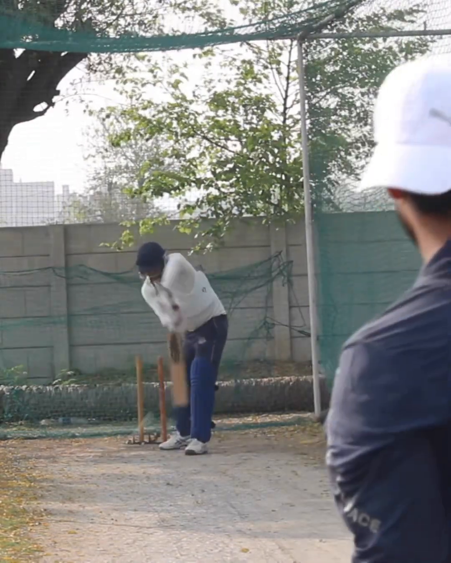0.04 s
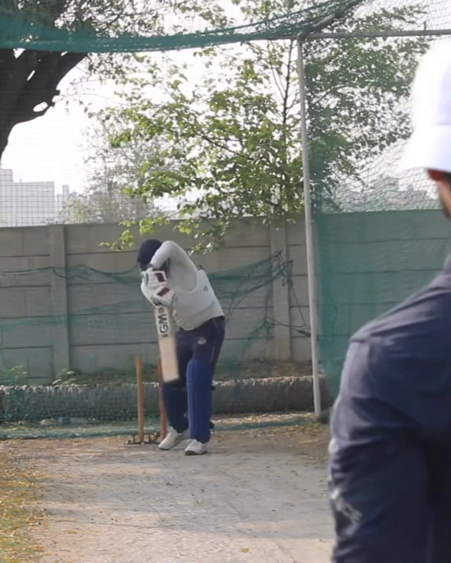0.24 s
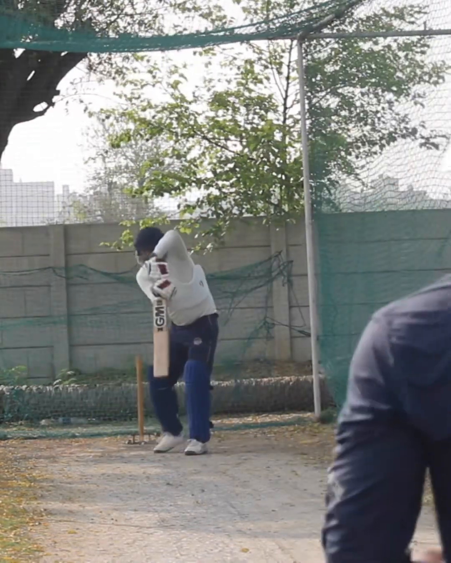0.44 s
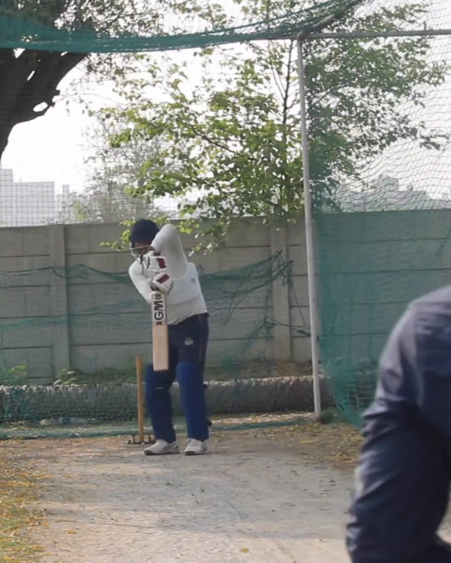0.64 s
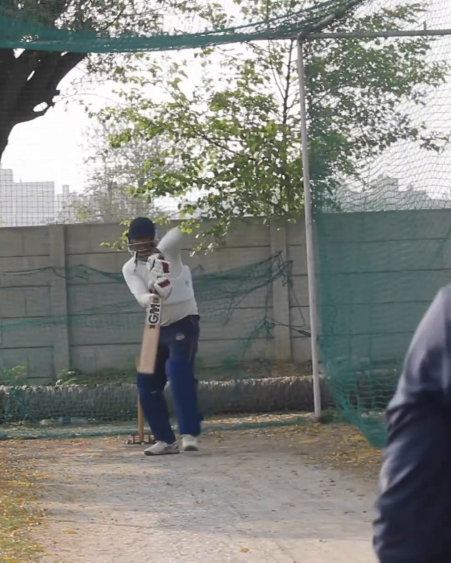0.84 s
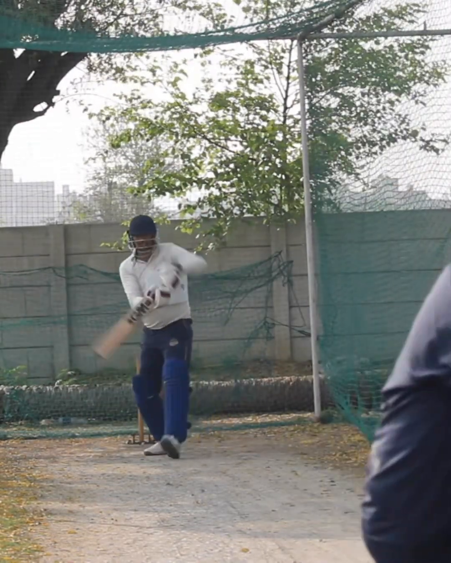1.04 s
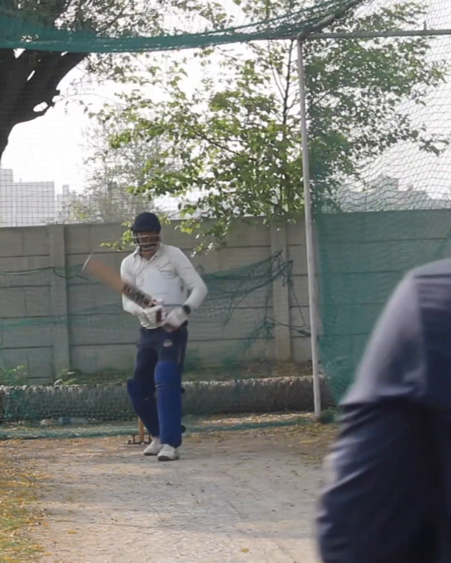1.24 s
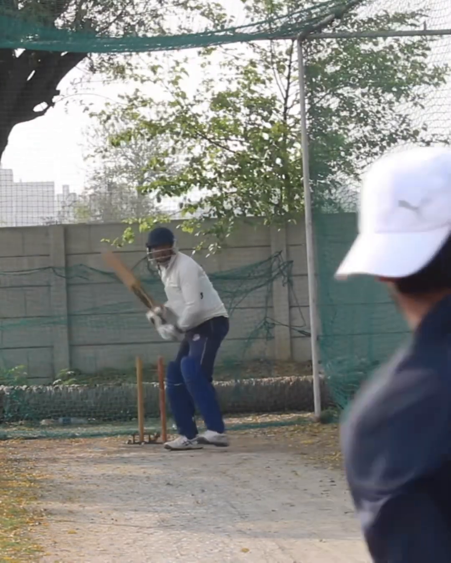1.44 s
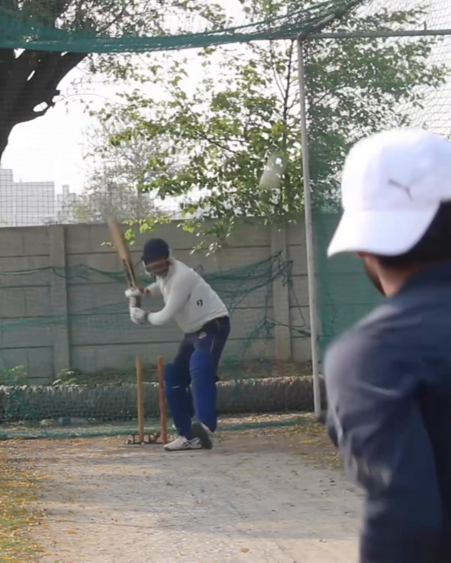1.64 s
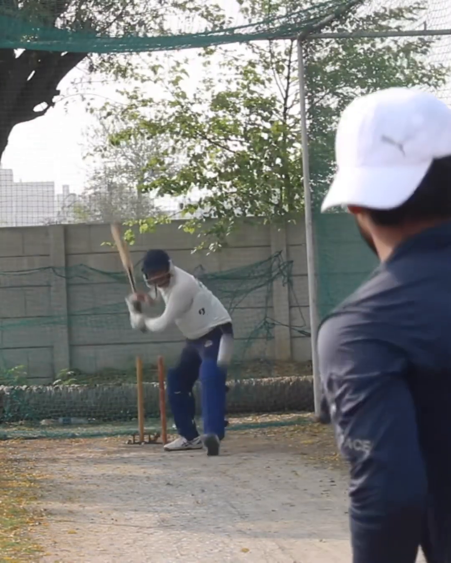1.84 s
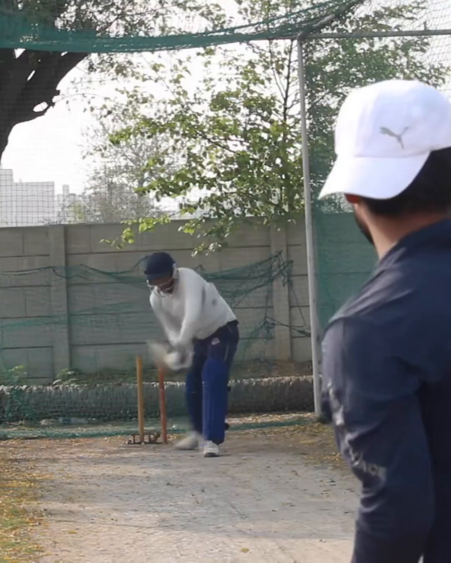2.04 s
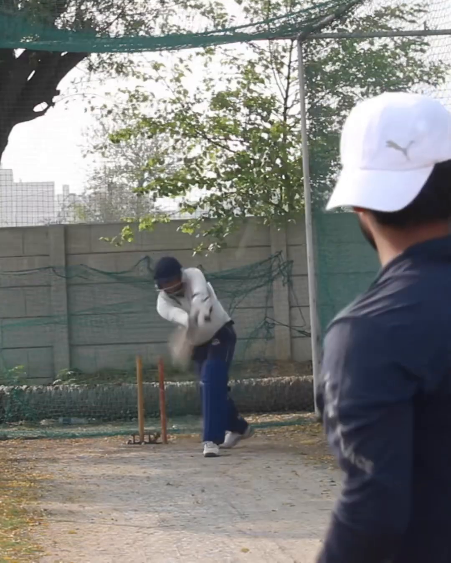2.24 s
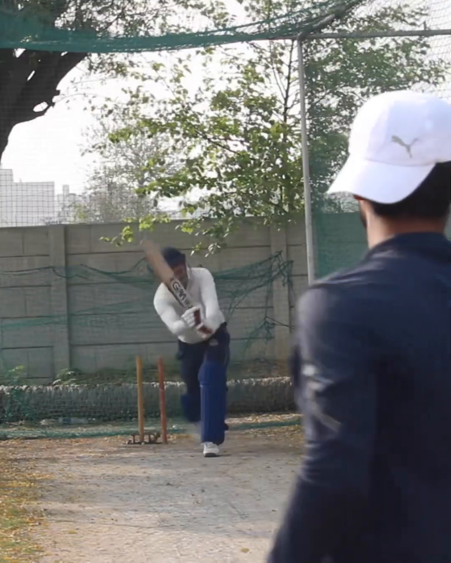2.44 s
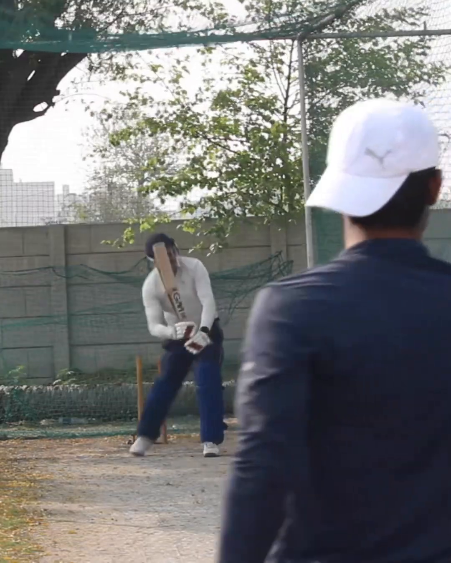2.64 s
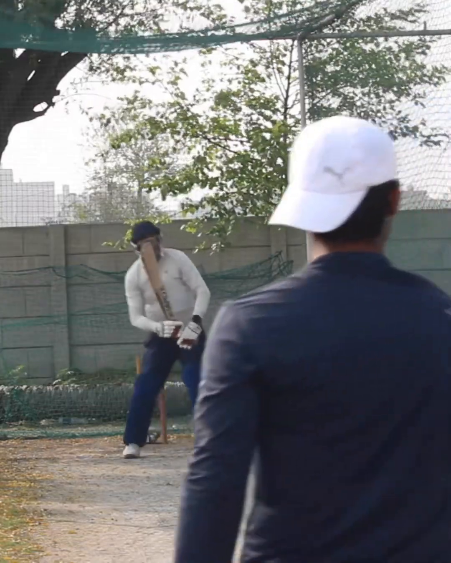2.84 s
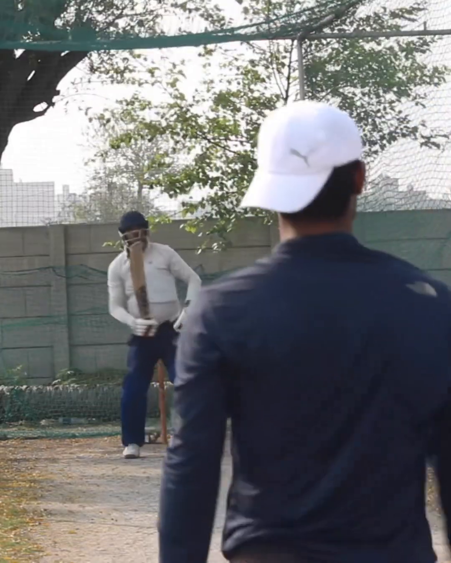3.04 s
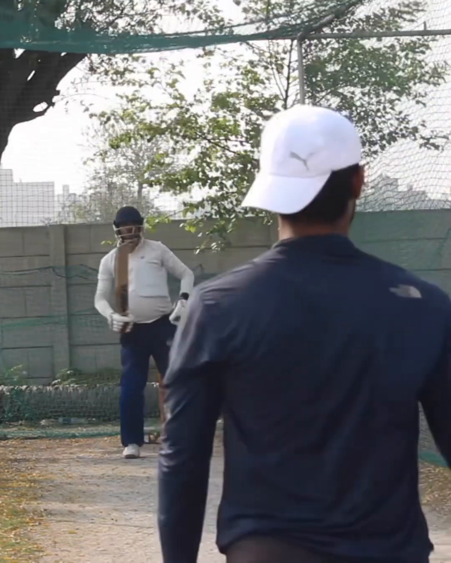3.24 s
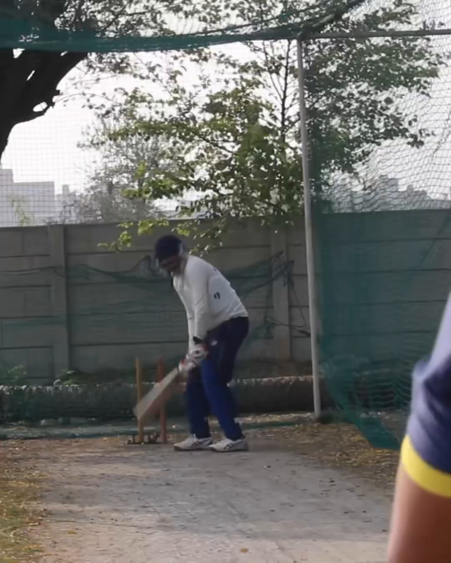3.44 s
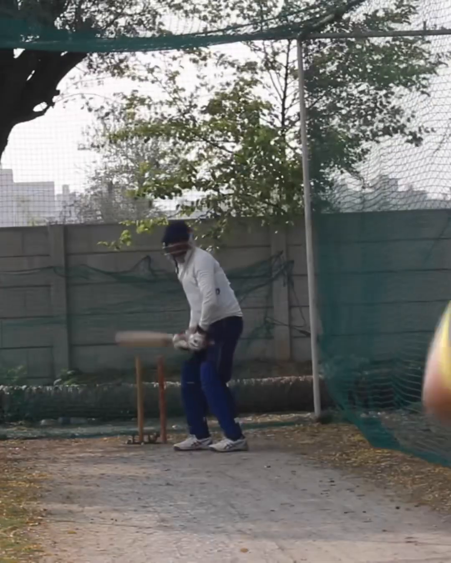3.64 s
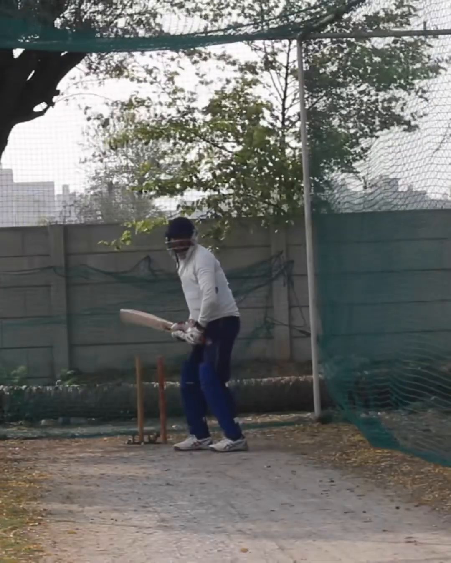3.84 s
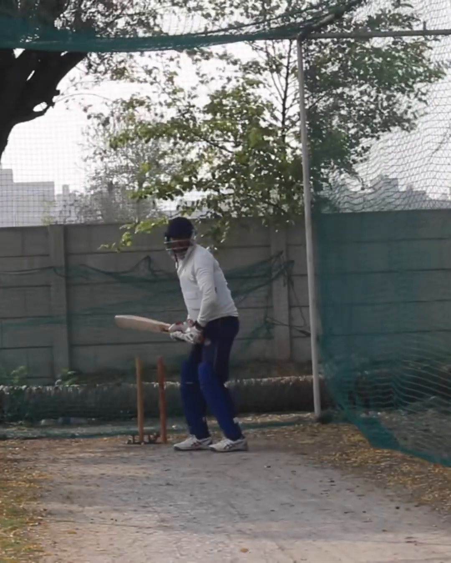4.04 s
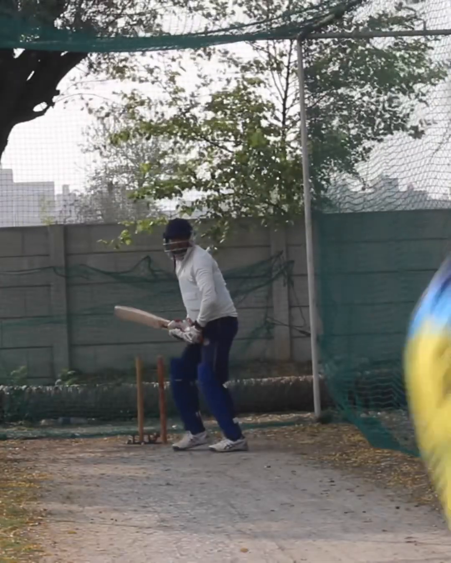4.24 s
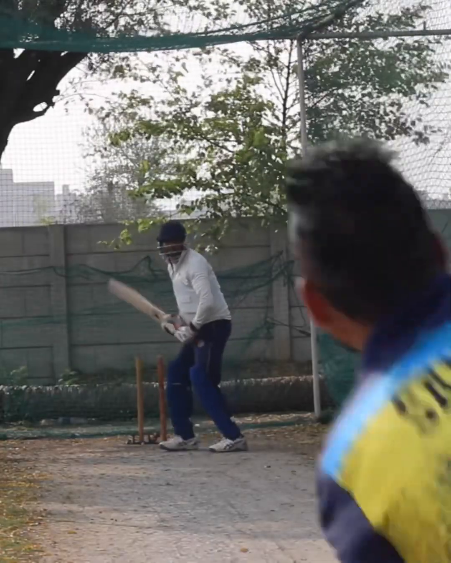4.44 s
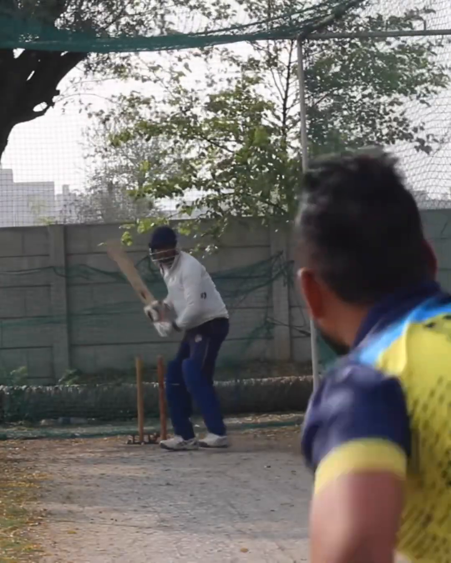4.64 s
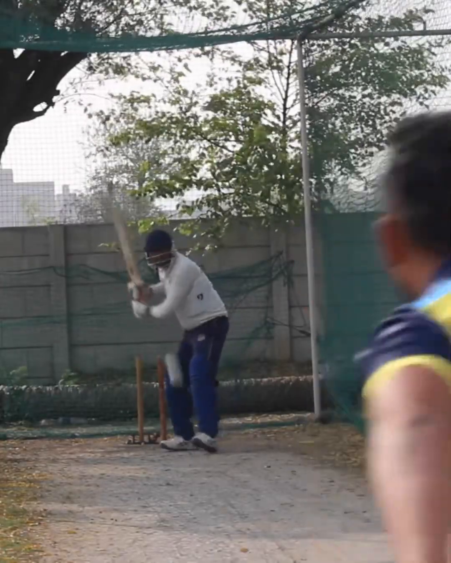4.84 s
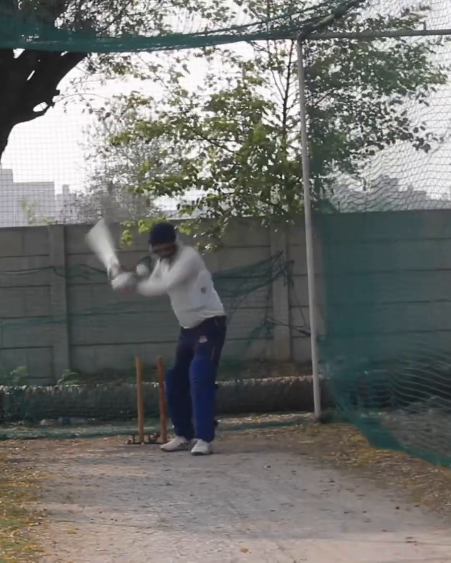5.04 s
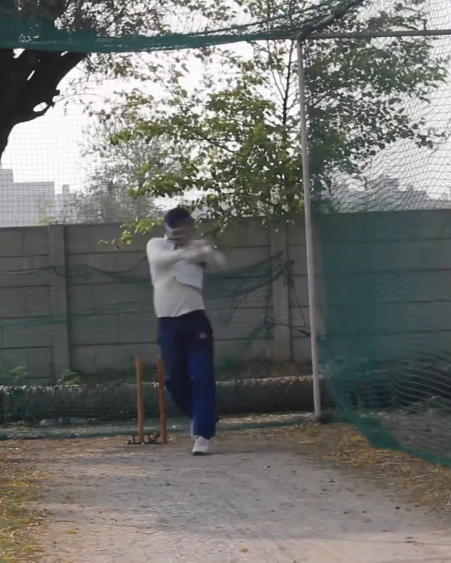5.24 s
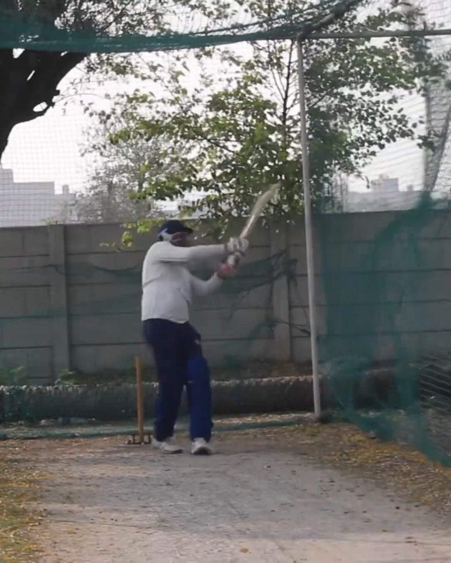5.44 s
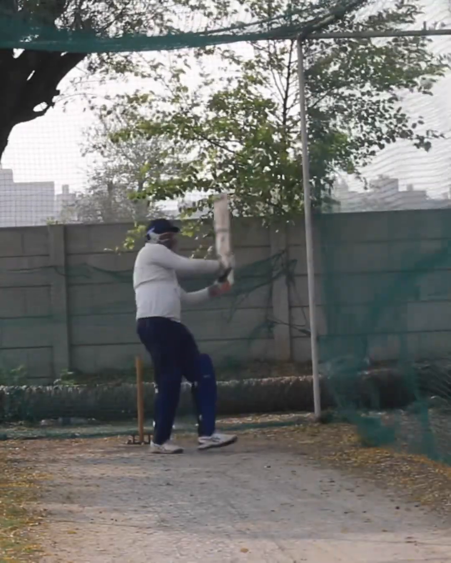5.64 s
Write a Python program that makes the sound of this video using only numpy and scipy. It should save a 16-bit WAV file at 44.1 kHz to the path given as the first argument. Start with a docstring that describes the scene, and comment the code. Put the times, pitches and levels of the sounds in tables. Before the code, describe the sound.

Two sharp cracks of a cricket bat on a ball, about three seconds apart, overload a close microphone and echo briefly off concrete walls. Before them, a struck steel pole gives a high, quivering ring. Between them come a soft net rustle, dull knocks, a shoe squeak and low bumps of air on the microphone. Small birds and a distant town sit behind it all in the outdoor practice lane, with two very short dropouts.

```python
"""Outdoor cricket nets between concrete walls, one microphone close to the bat. The tail of a hit dies
away; then willow cracks twice against the ball, overloading the microphone, and the walls answer. A struck
steel pole rings, there are knocks and rubs, and air buffets the microphone as the bowler runs past.
Farther off, small birds chirp over the rumble of a town. The sound drops out briefly between deliveries.
"""
import sys
import numpy as np
from scipy import signal
from scipy.fft import rfft, irfft, next_fast_len
from scipy.io import wavfile
from scipy.ndimage import map_coordinates

SR = 44100
rng = np.random.default_rng(int(sys.argv[2]) if len(sys.argv) > 2 else 0)


def pcm_store(signal):
    """Save signal as 16-bit PCM."""
    levels = np.round(np.clip(np.atleast_2d(signal), -1, 1) * 32767)
    wavfile.write(sys.argv[1], SR, levels.astype(np.int16).T)


N = 251502
TIME = np.arange(N) / SR

# bat on ball: t/s, level/dB, favoured f/Hz, spread/octaves, crack/dB, back wall delay/s, back wall/dB
BAT_STROKES = [(2.1646, 10, 760, .7, -5.5, .0493, -14), (5.1712, 11, 1310, .4, -5.5, .0472, -8)]
# modes of the willow blade: f/Hz, level/dB, t60/s
BLADE_MODES = [(230, -5, .04), (420, -5, .02), (660, -4, .016), (900, -4, .014), (1190, -5, .012),
               (1340, -1, .0145)]
# echoes off near walls and ground: delay/s, level/dB, treble limit/Hz
NEAR_ECHOES = [(.0035, -24, 5000), (.0113, -19, 5000), (.0132, -19, 9000), (.0153, -19, 4000),
               (.0227, -22, 3000), (.0318, -24, 1500)]
# spectra of the instant of contact and of its scattered fizz: f/Hz, level/dB
CRACK_SPECTRUM = [(600, -34), (1800, 8), (4000, 11), (8000, 3), (12000, -6.5), (16000, -17)]
FIZZ_SPECTRUM = [(800, -26), (1700, 10), (2400, 16.5), (3600, 17.5), (5500, 14.5), (8800, 9), (12000, -7),
                 (16000, -39)]

def bat(crack_t60=0.0095, fizz_db=-28, body_db=-14, scatter_t60=0.21, scatter_rise_s=0.011):
    """Close up, each stroke rings the blade; where the ball lands decides which modes are favoured."""
    out, t = np.zeros(N), TIME[:SR // 2]
    for s, db, favoured_hz, octaves, crack_db, wall_delay, wall_db in BAT_STROKES:
        ring = np.zeros(len(t))
        for hz, mode_db, t60 in BLADE_MODES:
            favour = np.exp(-.5 * (np.log2(hz / favoured_hz) / octaves) ** 2)
            ring += amp(mode_db) * favour * sine(hz, t) * fade(t, t60)
        crack = amp(crack_db) * noise(CRACK_SPECTRUM)[:len(t)] * fade(t, crack_t60)
        blow = amp(db) * (crack - ring)
        add(out, s, blow)
        for delay, echo_db, limit_hz in NEAR_ECHOES:
            add(out, s + delay, amp(echo_db) * lowpass(blow, limit_hz))
        # the back wall returns only the woody ring
        add(out, s + wall_delay, -amp(db + wall_db) * ring * onset(t, 0.00047))
        # poles, nets and ground scatter ring and crack into a short dense tail
        tail = onset(t, scatter_rise_s) * fade(t, scatter_t60)
        paths = tail * rng.standard_normal(len(t))
        body = signal.fftconvolve(ring, paths / np.linalg.norm(paths))[:len(t)]
        fizz = tail * noise(FIZZ_SPECTRUM)[:len(t)]
        add(out, s, amp(db) * (amp(body_db) * body + amp(fizz_db) * fizz))
    return out


# modes of the steel pole: f/Hz, level/dB, t60/s
POLE_MODES = [(2998.5, -11.5, .9), (3035, -23.5, 1), (3076, -22.5, .75), (3243, -25, .4), (3375, -28, .42),
              (3485, -32, .32), (3756, -32, .3), (4800, -15, .018), (8315, -18, .3), (8420, -25, .17),
              (8622, -31, .22)]

def pole(strike_s=.2697, tick_db=-12, sway_hz=37.3, sway_rad=0.71, flutter_db=1.75):
    """A sharp blow on steel: the pole sways, so its ring quivers in pitch and flutters as it dies."""
    out, t = np.zeros(N), TIME[:SR * 2]
    quiver = sway_rad * sine(sway_hz, t)
    flutter = amp(flutter_db * wobble(72)[:len(t)])
    ring = flutter * sum(amp(db) * sine(hz, t, quiver) * fade(t, t60) for hz, db, t60 in POLE_MODES)
    tick = lowpass(lowpass(rng.standard_normal(len(t)), 7400), 8500) * fade(t, 0.019)
    add(out, strike_s, ring * onset(t, 0.00044) + amp(tick_db) * tick)
    return out


# the dying tail of a hit as the sound opens, then knocks:
# t/s, click level/dB, click f/Hz, thud level/dB, thud f/Hz
CONTACTS = [(.0003, -3.5, 2040, -9, 900), (0.26, -40, 2480, -4, 1400), (2.006, -11, 4360, -8.5, 920),
            (2.0858, -22, 4490, -47, 600), (3.2308, -18, 2470, -5.5, 567), (3.2338, -22, 1500, -12.5, 226),
            (3.734, -25, 5700, -13, 129), (4.195, -26, 1500, -14.5, 596), (4.224, -20, 4200, -21, 700),
            (4.270, -35, 2020, -15, 403), (4.6401, -4, 4180, -4, 610), (4.841, -21.5, 2180, -18, 900),
            (5.6427, -19, 2100, -26, 1210), (5.687, -17, 1550, -15, 513)]

def knocks(click_t60=0.0047, grit=0.75, thud_cycles=3.7, dust_db=-27, dust_t60=0.23, treble_hz=9000):
    """Dead contacts along the lane: a click, a thud of a few cycles and a little loose grit."""
    out, t = np.zeros(N), TIME[:SR // 5]
    for s, click_db, click_hz, thud_db, thud_hz in CONTACTS:
        rough = unit(lowpass(rng.standard_normal(len(t)), 1.6 * click_hz))
        click = (sine(click_hz, t) + grit * rough) * fade(t, click_t60)
        dust = amp(dust_db) * rough * fade(t, dust_t60)
        thud = sine(thud_hz, t) * fade(t, thud_cycles / thud_hz)
        add(out, s, (amp(click_db) * (click + dust) - amp(thud_db) * thud) * onset(t, 0.000068))
    return lowpass(out, treble_hz)


# the dying tail of the opening hit, then rubs:
# peak t/s, rise/s, fall/s, body level/dB, body f/Hz, hiss level/dB
RUBS = [(.002, 0.0023, 0.035, -19, 1440, -30), (0.029, 0.014, 0.0079, -18, 473, -47),
        (.19, 0.053, 0.032, -34, 1380, -48), (.73, 0.031, 0.093, -42, 1110, -35),
        (4.37, 0.039, 0.035, -38, 1420, -37.5), (4.873, 0.015, 0.0091, -19, 1290, -31),
        (5.06, 0.024, 0.099, -36, 1390, -49)]
# the ball lands in the net: t/s, body level/dB, body f/Hz, hiss level/dB
NET_CATCHES = [(0.278, -20, 620, -34.5), (2.403, -25.5, 1060, -34), (5.45, -35, 1310, -70)]
# spectrum of a rub's body: multiple of body f, level/dB
BODY_SPECTRUM = [(.15, -13), (.6, -3), (1, -1.5), (1.4, -6), (2.5, -11.5), (6, -56)]
# spectrum of its hiss: f/Hz, level/dB
HISS_SPECTRUM = [(2000, -41), (3400, -3.5), (5380, -6.5), (8790, -9.5), (10300, -16), (12400, -29.5),
                 (15000, -45)]

def scuffs(grain_db=2, settle_db=-8):
    """After the tail of the opening hit, rubs swell and die, made grainy by many tiny slips."""
    out, hiss = np.zeros(N), noise(HISS_SPECTRUM)

    def rub(body_db, body_hz, hiss_db):
        body = noise([(body_hz * multiple, db) for multiple, db in BODY_SPECTRUM])
        return amp(body_db) * body + amp(hiss_db) * hiss

    for s, rise_s, fall_s, *colour in RUBS:
        out += swell(s, rise_s, fall_s) * rub(*colour)
    # the net takes the ball, then rustles while it swings
    for s, *colour in NET_CATCHES:
        catch = swell(s, rise_s=0.011, fall_s=0.025)
        settle = amp(settle_db) * swell(s, rise_s=0.11, fall_s=.2)
        out += np.hypot(catch, settle) * rub(*colour)
    return out * unit(amp(grain_db * wobble(800)))


# modes of a small fitting on the net: f/Hz, level/dB, t60/s
CLINK_MODES = [(1400, -25, .1), (3200, -29, .18), (9100, -35, .18)]

def net_clink(clink_s=2.399, tick_db=-19, tick_t60=0.015):
    """The tautened net makes a small fitting clink."""
    out, t = np.zeros(N), TIME[:SR // 4]
    ring = sum(amp(db) * sine(hz, t, .8 * wobble(290)[:len(t)]) * fade(t, t60)
               for hz, db, t60 in CLINK_MODES)
    tick = lowpass(rng.standard_normal(len(t)), 8300) * fade(t, tick_t60)
    add(out, clink_s, ring + amp(tick_db) * tick)
    return out


# sole squeaks: t/s, length/s, start f/Hz, end f/Hz, level/dB
SOLE_SLIPS = [(4.362, 0.012, 1750, 1650, -19), (4.381, 0.014, 11100, 11900, -36.5),
              (4.387, .022, 12000, 10200, -40)]

def squeaks(roughness=1.07):
    """A sole sticks and slips in the bowler's run-up."""
    out = np.zeros(N)
    for s, length, start_hz, end_hz, db in SOLE_SLIPS:
        add(out, s, amp(db) * chirp(length, start_hz, end_hz))
    return out * np.cos(roughness * wobble(1100))


# air bumps right on the microphone: t/s, level/dB, f/Hz
EDDIES = [(3.36, -24.5, 129), (3.674, -22.5, 130), (3.76, -16.5, 151), (3.803, -17, 84), (3.888, -14.5, 80),
          (3.945, -18, 159), (4.076, -14, 82), (4.092, -12.5, 185), (4.112, -16, 184), (4.27, -17, 55),
          (4.929, -19, 65.7), (4.962, -18, 92), (5.015, -15.5, 140)]

def buffets(churn_db=-9, churn_ratio=1.64, wake_s=0.013, offset=0.55):
    """Each eddy pushes on the microphone for about a cycle; a quicker eddy churns higher."""
    out, t = np.zeros(N), np.arange(-SR // 10, SR // 10) / SR
    for s, db, hz in EDDIES:
        churn = amp(churn_db) * unit(lowpass(rng.standard_normal(len(t)), churn_ratio * hz))
        bump = np.exp(-(hz * t) ** 2) * (np.cos(2 * np.pi * hz * t) - offset)
        add(out, s + t[0], amp(db) * (bump + np.exp(-np.abs(t) / wake_s) * churn))
    # the diaphragm leaks away any steady pressure
    return signal.sosfilt(signal.butter(2, 25, "highpass", fs=SR, output="sos"), out)


# the birds' two phrases, note by note: delay/s, length/s, start f/Hz, end f/Hz, level/dB
FALLING_NOTES = [(0, 0.025, 6530, 5900, 0), (.026, .032, 5580, 4720, 0.5), (0.043, .035, 4250, 3560, -2)]
RISING_NOTES = [(0, .062, 3190, 4055, 1), (.042, 0.0395, 4890, 5190, -6.5)]
# when each phrase is sung: t/s, level/dB, pitch ratio
FALLING_CALLS = [(0.393, -40.5, 0.93), (0.664, -42, 1), (0.951, -39, 1), (1.24, -45.5, 1),
                 (1.59, -48.5, 0.97), (1.86, -49, 0.98), (2.688, -42, 0.95), (2.974, -44.5, 0.94),
                 (3.244, -43, 0.98), (3.485, -45, 0.92)]
RISING_CALLS = [(3.735, -37.5, 1.02), (3.955, -48, 1.06), (4.01, -43, 1.16), (4.06, -44, 1.06),
                (4.399, -37, 1.04), (4.535, -42.5, 1.16), (4.715, -36, 1.06), (4.765, -40, .96),
                (4.981, -37.5, 1.03), (5.13, -50, 1.02), (5.555, -38, 1), (5.635, -34.5, .96)]
# calls from farthest away: t/s, length/s, f/Hz, level/dB
DISTANT_CALLS = [(1.067, 0.14, 2730, -42.5), (1.88, 0.3, 1409, -32.5), (3.467, 0.21, 1830, -37.5),
                 (4.016, 0.27, 1852, -40), (5.38, 0.22, 2677, -43)]

def birds(flutter_db=4.0, chatter_db=-50, chatter_hz=3200, span_hz=1500, glide=0.137, chatter_count=60):
    """Well off the microphone, birds whistle a falling phrase, later a rising one, over faint chatter."""
    song = np.zeros(N)
    for notes, calls in ((FALLING_NOTES, FALLING_CALLS), (RISING_NOTES, RISING_CALLS)):
        for s, db, register in calls:
            for delay, length, start_hz, end_hz, note_db in notes:
                pitch, accent_db = rng.normal([register, 0], [.006, 1.5])
                note = chirp(length, pitch * start_hz, pitch * end_hz)
                add(song, s + delay, amp(db + note_db + accent_db) * note)
    # the flock glides the same way as the phrase being sung
    turn_s = FALLING_CALLS[-1][0]
    for when, height in rng.random((chatter_count, 2)):
        s, hz = when * N / SR, chatter_hz + span_hz * height
        add(song, s, amp(chatter_db) * chirp(0.055, hz, hz * (1 + glide * np.sign(s - turn_s))))
    # many paths through the trees blur a far call into a narrow band
    for s, length, hz, db in DISTANT_CALLS:
        song += amp(db) * arch(s, length) * sine(hz, TIME, 1.06 * wobble(hz / 10))
    return song * amp(flutter_db * wobble(150))


# level of the low rumble: t/s, level/dB
RUMBLE_LEVELS = [(0.0, -48.5), (0.36, -33.5), (1.38, -38.5), (1.65, -36.5), (3.51, -38), (3.92, -29.5),
                 (4.7, -35), (5.02, -29.5), (5.22, -40), (5.7, -36.5)]
# spectra of the rumble and of a gust's deep push: f/Hz, level/dB
RUMBLE_SPECTRUM = [(13, -49), (25, -15), (81, 1), (183, -2), (227, -3), (301, -15.5), (430, -32),
                   (730, -120)]
GUST_SPECTRUM = [(13, -25), (28, -2.5), (45, -1), (85, 2), (160, -19), (400, -61)]

def air_rumble(rumble_db=-1, swing_db=2.0, gust_db=-30, gust_growth=1.86):
    """Air rumbles at the microphone; its deep push grows fastest as the level rises."""
    level_db = np.interp(TIME, *np.transpose(RUMBLE_LEVELS))
    rumble = amp(level_db + rumble_db + swing_db * wobble(23)) * noise(RUMBLE_SPECTRUM)
    gust = amp(gust_db + gust_growth * (level_db - level_db.max())) * noise(GUST_SPECTRUM)
    return rumble + gust


# background of each delivery: start t/s, town level/dB, leaves level/dB
BACKGROUND_LEVELS = [(0, -37, -50), (1.34, -37.5, -54), (3.31, -39, -49)]
# spectra of the distant town and of the leaves: f/Hz, level/dB
TOWN_SPECTRUM = [(130, -16.5), (220, -6.5), (258, 2.5), (540, -4.5), (664, -8.5), (796, -5), (1460, -6.5),
                 (1690, -9), (2710, -14), (3590, -19.5), (4000, -17.5), (5200, -25.5), (8800, -120)]
LEAF_SPECTRUM = [(2060, -9.5), (3500, -1.5), (4460, -12.5), (4970, -3.5), (5750, -7.5), (6360, -7),
                 (10200, -14), (14500, -38), (16000, -42)]

def town_and_leaves():
    """Beyond the nets, the wash of the town and a faint hiss of leaves waver slightly in level."""
    starts, town_db, leaves_db = np.transpose(BACKGROUND_LEVELS)
    delivery = np.searchsorted(starts[1:], TIME)
    town = amp(town_db[delivery] + 0.49 * wobble(6.68)) * noise(TOWN_SPECTRUM)
    leaves = amp(leaves_db[delivery] + 0.4 * wobble(16)) * noise(LEAF_SPECTRUM)
    return town + leaves


# far engines: t/s, length/s, f/Hz, level/dB
ENGINE_HUMS = [(0.045, 0.64, 282.5, -35), (1.487, 0.29, 134.2, -30.5), (1.99, 1.54, 177.6, -36)]

def engines():
    """Each far engine reaches the microphone as one drifting tone that swells and fades."""
    drift = .5 * wobble(12.0)
    return sum(amp(db) * arch(s, length) * sine(hz, TIME, drift) for s, length, hz, db in ENGINE_HUMS)


# reverberation of the practice lane: f/Hz, t60/s
LANE_DECAY = [(150, 0.078), (1300, 0.52), (4000, 0.12), (12000, 0.15)]

def lane_echo(x):
    """The diffuse answer of walls and trees; the midrange lingers longest."""
    hz, t, bands = signal.stft(rng.standard_normal(SR // 2), SR, nperseg=256)
    tail = signal.istft(bands * fade(t, along(LANE_DECAY, hz)[:, None]), SR, nperseg=256)[1]
    return signal.fftconvolve(x, tail / np.linalg.norm(tail))[:N]


def amp(db):
    """Decibels to gain."""
    return 10 ** (np.asarray(db) / 20)


def unit(x):
    """Scale to rms 1."""
    return x / np.sqrt(np.mean(x ** 2) + 1e-20)


def along(points, hz):
    """(Hz, value) points read on a log axis."""
    f, values = np.transpose(points)
    return np.interp(np.log(hz + 1), np.log(f + 1), values)


def noise(spectrum):
    """Noise of rms 1 with the given colour."""
    size = next_fast_len(N + SR // 4)
    colour = amp(along(spectrum, np.fft.rfftfreq(size, 1 / SR)))
    return unit(irfft(rfft(rng.standard_normal(size)) * colour, size)[:N])


def wobble(rate):
    """A smooth random curve, rate knots a second."""
    return map_coordinates(rng.standard_normal(int(N * rate / SR) + 4), [TIME * rate])


def sine(hz, t, phase=0):
    """A tone, its phase in radians."""
    return np.sin(2 * np.pi * hz * t + phase)


def chirp(length, start_hz, end_hz, bend=1.82):
    """One whistled note whose glide quickens towards its end."""
    progress = np.linspace(0, 1, int(length * SR))
    hz = start_hz + (end_hz - start_hz) * progress ** bend
    return np.sqrt(signal.windows.tukey(len(hz), .5)) * np.sin(2 * np.pi * np.cumsum(hz) / SR)


def lowpass(x, hz):
    """Causal loss of treble."""
    return signal.sosfilt(signal.butter(2, min(hz, .45 * SR), fs=SR, output="sos"), x)


def onset(t, rise_s):
    """Exponential rise to 1."""
    return 1 - np.exp(-t / rise_s)


def fade(t, t60):
    """Exponential decay, 60 dB in t60."""
    return np.exp(-np.log(1000) * t / t60)


def swell(s, rise_s, fall_s):
    """A pointed swell peaking at time s."""
    return np.exp(-np.maximum((s - TIME) / rise_s, (TIME - s) / fall_s))


def arch(s, length):
    """A smooth swell from time s."""
    return np.sin(np.pi * np.clip((TIME - s) / length, 0, 1))


def add(track, s, sound):
    """Mix a sound into the track at time s."""
    i = max(round(s * SR), 0)
    track[i:i + len(sound)] += sound[:max(N - i, 0)]


def scene():
    """All sources at one microphone; the birds are distant, so more of their sound is echo."""
    blows, song = bat() + knocks(), birds()
    echo = lane_echo(amp(-25) * blows + amp(-9) * song)
    near = blows + pole() + net_clink() + scuffs() + squeaks() + buffets() + air_rumble()
    far = amp(-5.5) * song + town_and_leaves() + engines()
    return (near + far + echo)[None]


def gain_control(x, threshold_db=-16, release_s=.06, slope=.9, lag_s=.07):
    """Loud sound turns the gain down a moment later; it creeps back."""
    memory = np.exp(-1 / (release_s * SR))
    power = signal.lfilter([1 - memory], [1, -memory], x[0] ** 2)
    gain = (1 + power / amp(threshold_db) ** 2) ** (-slope / 2)
    return x * np.interp(TIME - lag_s, TIME, gain)


# dropouts between deliveries: start t/s, end t/s
DROPOUTS = [(1.316, 1.362), (3.286, 3.334)]

def record(dry, cut_s=0.0017, return_s=0.021, floor_db=-48, top_hz=16200):
    """The sound cuts out and fades back twice; loud cracks clip and duck the gain; the top is lost."""
    gate = np.ones(N)
    for start, end in DROPOUTS:
        gate *= np.clip(np.maximum((start - TIME) / cut_s, (TIME - end) / return_s), 0, 1)
    clipped = np.clip(dry * np.maximum(gate, amp(floor_db)), -1, 1)
    size = next_fast_len(N + SR // 4)
    passband = np.fft.rfftfreq(size, 1 / SR) < top_hz
    return irfft(rfft(gain_control(clipped), size) * passband, size)[..., :N]


dry = scene()
out = record(dry)
pcm_store(out)
```